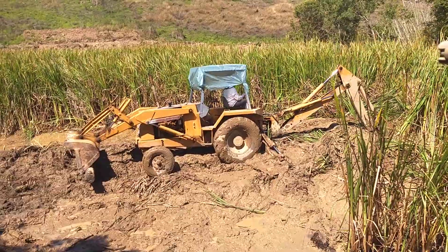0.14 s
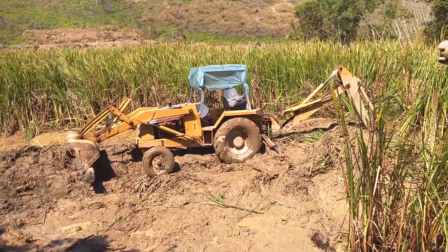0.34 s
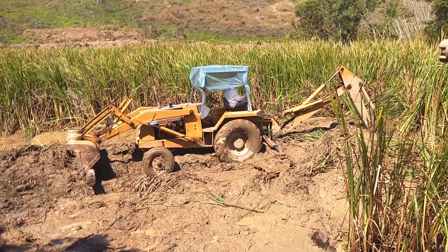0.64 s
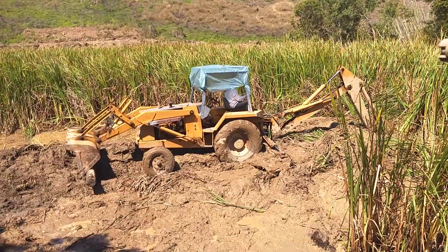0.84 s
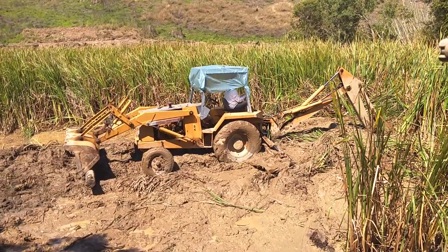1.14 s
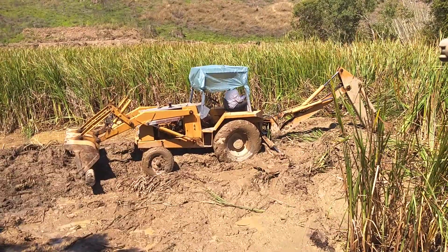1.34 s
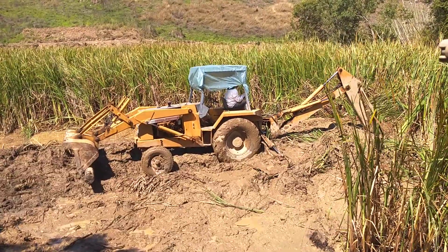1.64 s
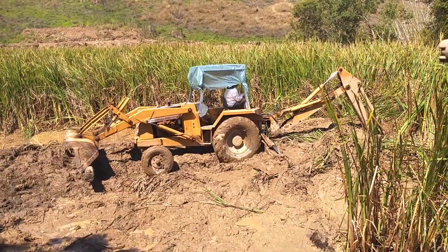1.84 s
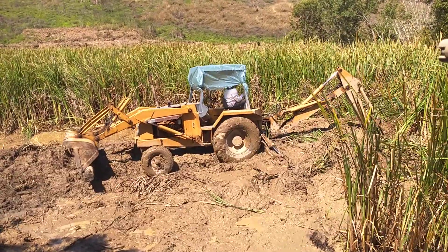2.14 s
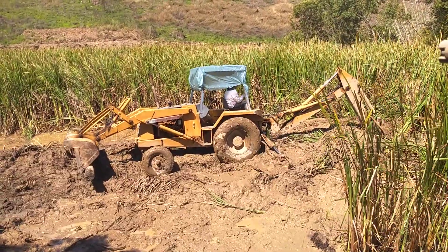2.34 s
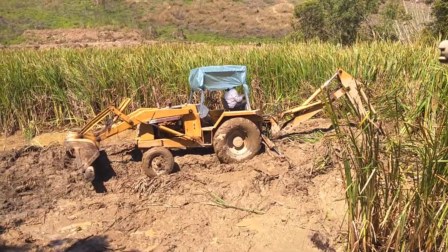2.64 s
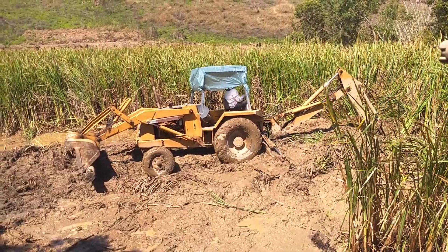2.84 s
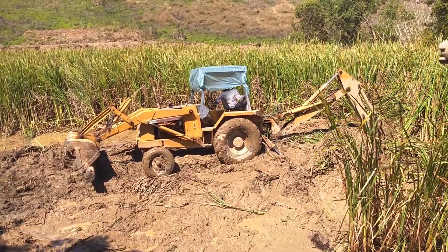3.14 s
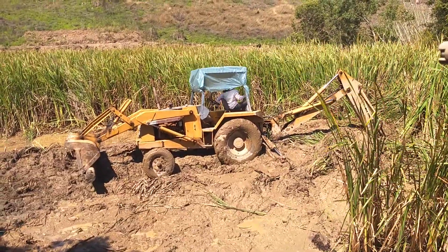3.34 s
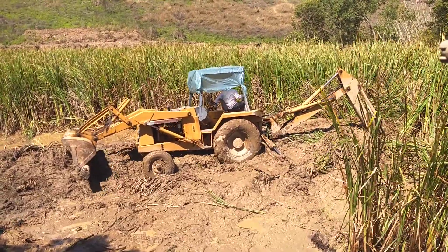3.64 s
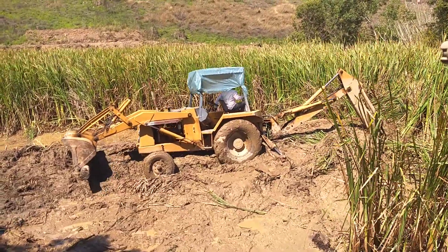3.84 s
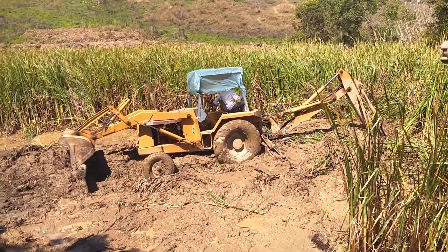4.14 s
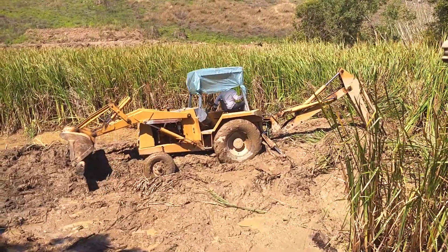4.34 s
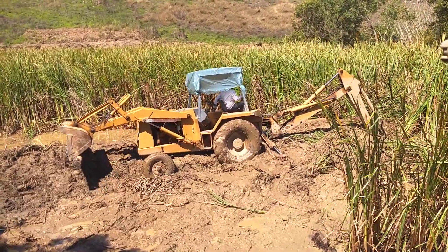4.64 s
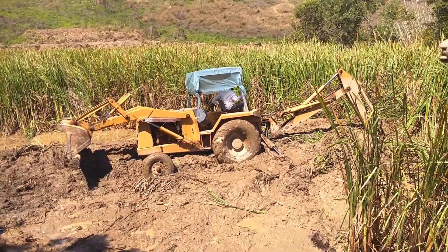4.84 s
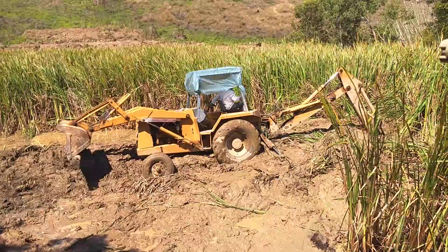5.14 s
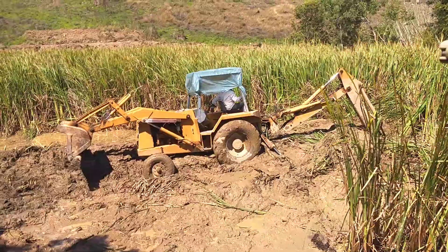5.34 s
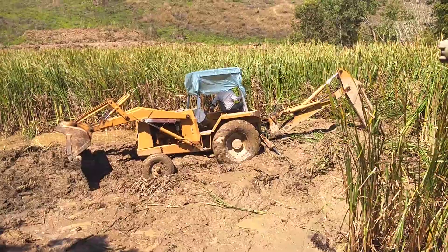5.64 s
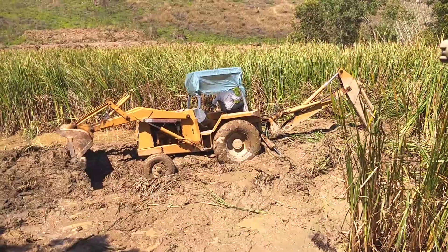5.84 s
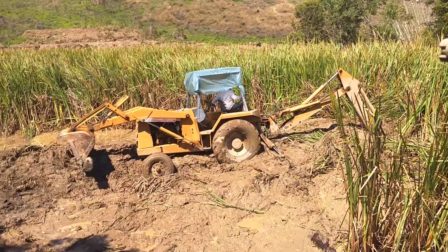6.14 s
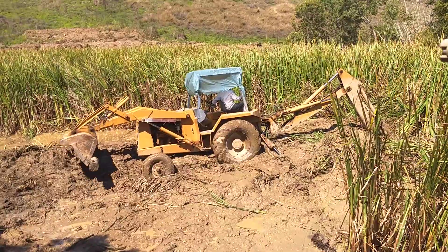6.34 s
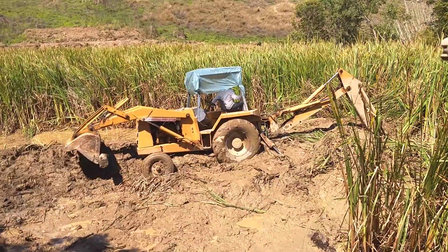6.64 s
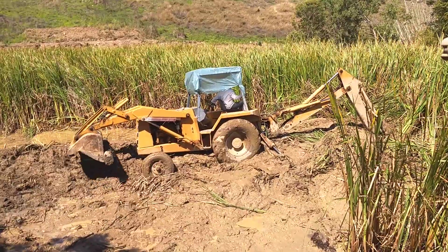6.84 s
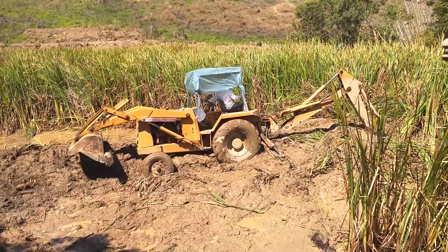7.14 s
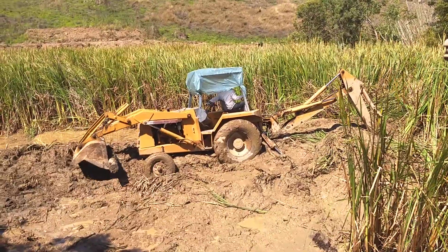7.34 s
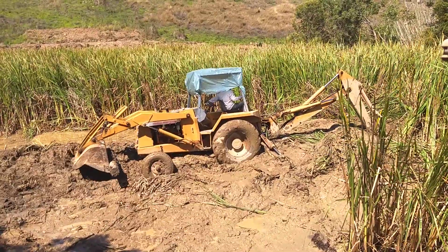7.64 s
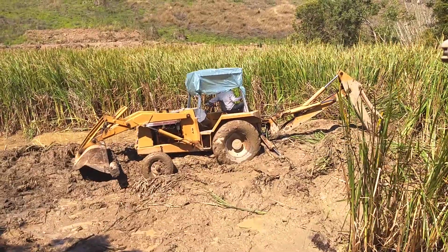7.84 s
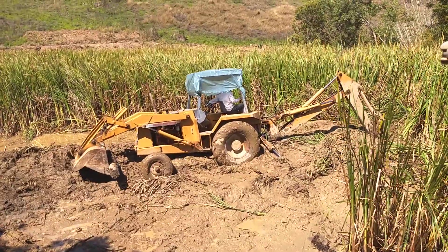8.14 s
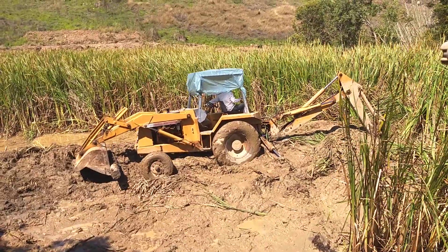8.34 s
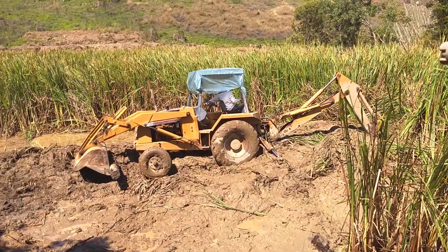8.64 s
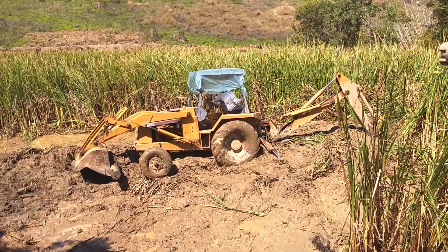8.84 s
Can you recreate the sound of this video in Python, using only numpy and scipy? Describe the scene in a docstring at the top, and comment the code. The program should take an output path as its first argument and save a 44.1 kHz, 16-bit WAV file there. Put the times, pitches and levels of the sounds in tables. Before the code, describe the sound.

Two diesel engines rumble low and hollow on soft ground, one straining now and then, with a few sharp metallic bucket bangs mid-way.

```python
"""Two diesels throb throughout: a backhoe's exhaust note beats against a second, slower and steady engine.
The backhoe sags under load and recovers, with hums locked to its crankshaft and noise pulsed by its firings.
Reeds rustle as shaped noise, and the steel bucket clanks as noise bursts and decaying modes.
Once the sound skips a moment, with a click. The left channel is weaker and of opposite polarity;
the machines reach it later than the right, which makes the rumble wide and hollow."""
import sys
import numpy as np
from scipy.fft import rfft, irfft, next_fast_len
from scipy.io import wavfile
from scipy.ndimage import map_coordinates

SR = 44100
rng = np.random.default_rng(int(sys.argv[2]) if len(sys.argv) > 2 else 0)


def store_pcm(level_fs):
    """Save levels as 16-bit WAV."""
    pcm = np.round(np.clip(level_fs, -1, 1) * 32767).astype(np.int16)
    wavfile.write(sys.argv[1], SR, np.atleast_2d(pcm).T)


N = 397341  # length in samples


def amp(db):
    """Decibels to gain."""
    return 10 ** (np.asarray(db) / 20)


def unit(x):
    """Scale to rms 1."""
    return x / np.sqrt(np.mean(x ** 2) + 1e-20)


def along(points, hz):
    """Read (Hz, value) points on a log frequency axis."""
    f, value = np.transpose(points)
    return np.interp(np.log(hz + 1), np.log(f + 1), value)


def curves(rows):
    """One value per sample for each column after the time."""
    seconds, *columns = np.transpose(rows)
    return [np.interp(np.arange(N) / SR, seconds, column) for column in columns]


def wobble(rate):
    """A smooth random curve with rate knots a second."""
    knots = np.random.default_rng(rng.integers(2 ** 31)).standard_normal(int(N * rate / SR) + 4)
    return map_coordinates(knots, [np.arange(N) * rate / SR])


def filtered(x, response):
    """Filter x by a complex response of frequency."""
    size = next_fast_len(N + SR // 2)
    spectrum = rfft(x, size) * response(np.fft.rfftfreq(size, 1 / SR))
    return irfft(spectrum, size)[..., :N]


def coloured(x, spectrum):
    """Shape x by (Hz, dB) points, then scale it to rms 1."""
    return unit(filtered(x, lambda hz: amp(along(spectrum, hz))))


def resonances(modes, f):
    """Response of a few resonances, alternating in sign."""
    total = 0
    for k, (centre, width, db) in enumerate(modes):
        peak = 1j * f * width / (centre * centre - f * f + 1j * f * width)
        total = total + (-1) ** k * amp(db) * peak
    return total


# How alike the two channels are. Each row: frequency in Hz, likeness from 0 to 1.
CHANNEL_LIKENESS = [(300, 0.98), (600, 0.96), (1200, 1), (1800, 0.96), (2500, 0.96), (4000, 0.94),
                    (8000, 0.77), (12000, 0.77), (15000, .62)]


def air():
    """White noise at two microphones, less alike towards the treble."""
    def mid_and_side(hz):
        turn = np.arccos(np.clip(along(CHANNEL_LIKENESS, hz), 0, 1)) / 2
        return np.array([np.cos(turn), np.sin(turn)])
    mid, side = filtered(rng.standard_normal((2, N)), mid_and_side)
    return np.array([mid + side, mid - side])


def mechanical(cycles, repeat):
    """Noise of which a share of the power comes back alike with every round of the four cylinders."""
    size = 3200  # pattern points a round
    pattern = rng.standard_normal(size)
    locked = map_coordinates(pattern, [cycles / 4 % 1 * size], mode="grid-wrap")
    share = np.clip(repeat, 0, 1)
    return np.sqrt(share) * locked + np.sqrt(1 - share) * air()


def firings(cycles, cylinder_db, scatter_db, decay):
    """A burst at each firing, decaying over a number of cycles; four unequal cylinders take turns."""
    index = cycles.astype(int)
    scatter = scatter_db * rng.standard_normal(N // 100)[index]
    size_db = scatter + np.array(cylinder_db)[index % len(cylinder_db)]
    return unit(amp(size_db) * np.exp(-(cycles % 1) / decay))


def tones(cycles, orders, waver_db, rate):
    """Lines locked to the crankshaft, each wavering in strength."""
    total = 0
    for order, db in orders:
        total = total + amp(db + waver_db * wobble(rate)) * np.sin(2 * np.pi * order * cycles)
    return np.sqrt(2) * total


def struck(modes, t, blur):
    """Steel modes, rung at new strengths by every blow; rattling contacts blur their pitch."""
    total = 0
    for hz, db, t60 in modes:
        strength_db = db + rng.normal(0, 0.34)
        # A random start phase, then a random walk, in cycles
        drift = rng.random() + blur * np.cumsum(rng.standard_normal(len(t))) / np.sqrt(SR)
        total = total + amp(strength_db - 60 * t / t60) * np.sin(2 * np.pi * (hz * t + drift))
    return total


def knocked(modes, hits, blur):
    """One steel part, its modes rung by each hit."""
    out, t = np.zeros(N + SR), np.arange(SR // 2) / SR
    rise = 1 - np.exp(-t / .001)
    for seconds, db in hits:
        start = round(seconds * SR)
        out[start:start + len(t)] += amp(db) * rise * struck(modes, t, blur)
    return out[:N]


# Leaf rustle spectrum. Each row: frequency in Hz, relative level in dB per Hz.
LEAF_SPECTRUM = [(1200, -10), (2700, -2), (4200, 7.5), (6500, 2), (8000, -10), (11000, -13), (16000, -19)]
# Ticks of dry stalks. Each row: start in seconds, level in dB.
STALK_TICKS = [(2.958, -53), (3.080, -53), (3.880, -52), (4.460, -56), (4.556, -58), (5.274, -52)]
TICK_S = 0.049  # t60
# Stalk tick spectrum. Each row: frequency in Hz, relative level in dB per Hz.
STALK_SPECTRUM = [(1500, -20), (4000, 0), (9000, 0), (13000, 0), (16000, -10)]
LAG_S = .000415  # how much later the machines reach the left microphone


def reeds(level_db):
    """Leaves rustle and stalks tick on the side away from the engines, so they reach the left first."""
    leaves = amp(level_db + 2.5 * wobble(60)) * coloured(rng.standard_normal(N), LEAF_SPECTRUM)
    t = np.arange(N) / SR
    snaps = sum(amp(db - 60 * np.abs(t - s) / TICK_S) * (t >= s) for s, db in STALK_TICKS)
    rustle = leaves + snaps * coloured(rng.standard_normal(N), STALK_SPECTRUM)
    # Advance the left by two lags: record() delays it by one
    early = filtered(rustle, lambda hz: np.exp(4j * np.pi * hz * LAG_S))
    return np.array([early, rustle])


VALVE_DB = -64  # level at full load
# Valve hiss spectrum. Each row: frequency in Hz, relative level in dB per Hz.
VALVE_SPECTRUM = [(2000, -80), (3400, -24), (3850, 3), (4000, 0), (4400, -24), (7000, -80)]


def valve(load):
    """Oil hisses through the hydraulic valve when the load peaks."""
    return amp(VALVE_DB) * load ** 3 * coloured(air(), VALVE_SPECTRUM)


# Fan and hydraulic hiss spectrum. Each row: frequency in Hz, relative level in dB per Hz.
HISS_SPECTRUM = [(1200, -25), (2800, -1.5), (3300, 2.5), (4200, -5.5), (4900, 6), (6000, -1), (7100, -3.5),
                 (8300, -1), (10000, -4.5), (12000, -6.5), (13200, -3), (14500, -11), (16000, -8.5)]


def hiss(cycles, load, level_db):
    """Fan and hydraulics hiss with a fine crackle; under load the injectors tick through."""
    ticks = firings(cycles, [.5, -.5, .4, -.4], scatter_db=2, decay=.35)
    crackle = amp(1.2 * wobble(230) + 1.1 * wobble(40))
    flutter = crackle * (1 + 0.12 * load * ticks)
    return amp(level_db) * coloured(mechanical(cycles, repeat=0.11) * flutter, HISS_SPECTRUM)


# Gear whine lines. Each row: multiple of the firing rate, level in dB over the whine level.
GEAR_ORDERS = [(21, -4), (27, -3.5), (34.5, -7), (36, 2.5), (38, -8), (39, -15), (41.2, -21), (57.6, -8.5),
               (69, -19)]
# Whine level. Each row: time in seconds, level in dB.
WHINE_LEVEL = [(0, -59.5), (1.3, -65), (2.4, -57), (3.4, -68), (5, -64), (6.1, -63), (7.3, -71), (8.1, -60),
               (8.6, -63.5), (9, -63)]


def whine(cycles):
    """Gear teeth sing, blurred by the uneven turning of the shaft."""
    level_db, = curves(WHINE_LEVEL)
    unevenness = .0045 * wobble(28) + .0013 * wobble(110)  # in cycles
    return amp(level_db) * tones(cycles + unevenness, GEAR_ORDERS, waver_db=2.5, rate=22)


# Drone level. Each row: time in seconds, level in dB before the trim below.
DRONE_LEVEL = [(0, -56), (0.6, -37), (1.2, -44), (1.9, -62), (2.9, -47), (3.7, -62), (4.45, -38),
               (4.9, -60), (5.15, -34), (5.52, -30.5), (5.65, -48), (5.95, -34), (6.6, -55), (7.2, -45),
               (7.9, -40.5), (8.6, -38.5), (9, -39)]
DRONE_TRIM_DB = -1


def drone(cycles):
    """The backhoe's fifth order drones in the silencer, swelling and fading."""
    level_db, = curves(DRONE_LEVEL)
    uneven = cycles + .004 * wobble(20)
    return amp(level_db + DRONE_TRIM_DB) * tones(uneven, [(5, 0)], waver_db=1.5, rate=12)


# Low modes of the bucket's shell. Each row: frequency in Hz, relative level in dB, t60 in seconds.
SHELL_MODES = [(198, -4.5, .3), (263.8, -4, 0.44), (379, -9, 0.22), (487, -17.5, 0.41)]
# Thuds of the shell. Each row: start in seconds, level in dB.
SHELL_THUDS = [(6.333, -16.5), (6.366, -17), (6.432, -24.5)]
# Modes of the bucket's end stop. Each row: frequency in Hz, relative level in dB, t60 in seconds.
STOP_MODES = [(883, 4, 0.22), (1944, 0, .25), (3480, -11, 0.22), (4800, -8, 0.22), (4960, -13, .25),
              (5100, -8, 0.27), (5840, -15, .25)]
# Rebounds on the stop. Each row: start in seconds, level in dB.
STOP_REBOUNDS = [(6.403, -39.5), (6.418, -45)]
# Modes of the bucket link. Each row: frequency in Hz, relative level in dB, t60 in seconds.
LINK_MODES = [(2460, -5, .25), (2600, 2, 0.24), (2955, -10, .4), (4340, -16, .4), (4936, -10, .33)]
# Clinks of the link. Each row: start in seconds, level in dB.
LINK_CLINKS = [(7.070, -50), (7.095, -49)]


def linkage():
    """The bucket's shell thuds, it rebounds on its stop, and its slack link clinks on the pin."""
    shell = knocked(SHELL_MODES, SHELL_THUDS, blur=1.4)
    stop = knocked(STOP_MODES, STOP_REBOUNDS, blur=2.2)
    link = knocked(LINK_MODES, LINK_CLINKS, blur=1.5)
    return shell + stop + link


# Blows and rattles. Each row: start in seconds, clang in dB, scrape in dB, bucket ring in dB,
# arm ring in dB, t60 of the clang and scrape in seconds.
BUCKET_BLOWS = [(3.46, -24, -50, -62, -46, 0.22), (3.474, -34, -50, -54, -43.5, .1),
                (3.492, -42, -44, -62, -47.5, 0.3), (3.530, -38, -54, -66, -51, .2),
                (5.163, -54, -53, -63, -75, 0.11), (6.331, -25.5, -66, -48, -70, 0.17),
                (6.345, -18.5, -62, -34, -60, 0.12), (6.370, -36, -58, -35.5, -70, 0.12),
                (6.401, -30.5, -53, -38, -58, 0.39), (6.415, -35, -55, -37, -60, .25),
                (6.438, -31, -59, -45, -54, 0.28), (6.468, -36, -59, -45, -66, 0.23),
                (6.547, -37, -50, -60, -75, .08), (6.596, -32, -60, -58, -75, .1),
                (6.903, -48, -51, -64, -75, .15), (7.065, -29, -57, -57, -65, 0.24),
                (7.075, -30, -60, -48, -64, .08), (7.095, -32, -57, -60, -65, 0.12)]
# First contact of a blow: level over its chatter, and t60
CRACK_DB, CRACK_S = -7, 0.012
# Dull clang spectrum. Each row: frequency in Hz, relative level in dB per Hz.
CLANG_SPECTRUM = [(100, -16), (190, 21), (280, 16), (450, 3), (750, 6.5), (1000, -1), (1400, -4.5),
                  (1800, -2), (2500, -10), (3200, -23), (5200, -23), (8000, -50), (15000, -53)]
# Bright scrape spectrum. Each row: frequency in Hz, relative level in dB per Hz.
SCRAPE_SPECTRUM = [(600, -25), (1500, 2), (2200, 13), (3300, -8), (5300, 1), (8000, -2.5), (12000, -1),
                   (16000, -24)]
# Bucket modes. Each row: frequency in Hz, relative level in dB, t60 in seconds.
BUCKET_MODES = [(700, 0.5, 0.2), (810, -4, 0.24), (1227, -5, .15), (1478, -2, 0.15), (1695, 0, 0.21),
                (1993, 0.5, 0.22), (2090, -2, 0.19), (2450, -8, 0.3), (2690, -10, 0.16), (3070, -16, 0.15),
                (3720, -21, .18)]
# Loader arm modes. Each row: frequency in Hz, relative level in dB, t60 in seconds.
ARM_MODES = [(500, 2, .2), (764, 2, 0.3), (883, -4, .25), (1217, -5, .25), (1525, 5, 0.16), (2272, 5, 0.26),
             (2433, 7, 0.32), (2620, -2, 0.4), (2955, -4, 0.42), (3386, -8, 0.4), (3900, -17, .35),
             (5367, -10.5, 0.32), (5819, -20, .3), (6487, -12, 0.28)]


def bucket():
    """Blows crack and set loose steel chattering: dull clang, bright scrape, ring of bucket and arm."""
    clang_power, scrape_power, ring = np.zeros((3, N + SR))
    t = np.arange(SR // 2) / SR
    rise = 1 - np.exp(-t / .0008)
    for seconds, clang_db, scrape_db, bucket_db, arm_db, t60 in BUCKET_BLOWS:
        start = round(seconds * SR)
        span = slice(start, start + len(t))
        fade = rise * (amp(-60 * t / t60) + amp(CRACK_DB - 60 * t / CRACK_S))
        # Overlapping noise bursts add in power
        clang_power[span] += (amp(clang_db) * fade) ** 2
        scrape_power[span] += (amp(scrape_db) * fade) ** 2
        bucket_ring = amp(bucket_db) * struck(BUCKET_MODES, t, blur=2.3)
        arm_ring = amp(arm_db) * struck(ARM_MODES, t, blur=1.1)
        ring[span] += rise * (bucket_ring + arm_ring)
    clang = np.sqrt(clang_power[:N]) * coloured(air(), CLANG_SPECTRUM)
    scrape = np.sqrt(scrape_power[:N]) * coloured(air(), SCRAPE_SPECTRUM)
    chatter = unit(amp(3 * wobble(380)))
    return chatter * (clang + scrape) + ring[:N] * unit(amp(1.5 * wobble(200)))


# Ringing covers. Each row: time in seconds, level in dB over the block clatter.
COVER_LEVEL = [(0, -8), (0.7, -5), (1.25, -3), (1.9, -7.5), (3.0, -6.5), (3.75, -3.5), (4.3, -8.5),
               (4.85, 1), (5.2, -9), (5.8, -4), (7.3, -7), (9, -7)]
# Resonances of block and covers. Each row: frequency in Hz, width in Hz, relative level in dB.
COVER_RESONANCES = [(577, 18, 6), (810, 41, -0.5), (1154, 61, 5), (1437, 42, 1), (1695, 34, -17),
                    (2030, 32, -11)]
# Block clatter spectrum. Each row: frequency in Hz, relative level in dB per Hz.
BLOCK_SPECTRUM = [(200, -42), (450, 0.5), (580, 3), (700, -5), (900, -4.5), (1020, -5.5), (1300, -10.5),
                  (1700, -9.5), (2050, -13.5), (2450, -15), (2800, -23.5), (5000, -48), (12000, -80)]


def clatter(cycles, level_db):
    """Combustion knocks and valve gear shake the block; its covers ring now harder, now softer."""
    covers_db, = curves(COVER_LEVEL)
    knocks = firings(cycles, [.8, -.2, 0, -.6], scatter_db=1, decay=3.6)
    ring_source = knocks * mechanical(cycles, repeat=0.26)
    ring = unit(filtered(ring_source, lambda f: resonances(COVER_RESONANCES, f)))
    block = coloured(knocks * mechanical(cycles, repeat=0.28), BLOCK_SPECTRUM)
    return amp(level_db) * block + amp(level_db + covers_db) * ring


# Backhoe exhaust, belt-driven fan and pump notes. Each row: multiple of the firing rate,
# level in dB, change at full load in dB.
BACKHOE_NOTES = [(1, -14.5, -2), (2, -26.5, 6.5), (3, -53.5, 16), (3.75, -49.5, 0), (4, -57.5, 18),
                 (4.36, -37.5, -7), (4.9, -46.5, -3)]
# Second engine's notes. Each row: multiple of its firing rate, level in dB.
SECOND_NOTES = [(1, -20.5), (1.5, -39), (2, -21), (2.5, -46), (3, -52.5), (4, -52), (4.5, -48), (5, -44.5),
                (5.5, -44.5), (6, -47.5), (7, -50.5)]
# Exhaust rasp spectrum. Each row: frequency in Hz, relative level in dB per Hz.
RASP_SPECTRUM = [(60, -14), (125, -15), (158, -3), (176, -9), (198, 3), (220, -5), (243, -0.5), (280, -1.5),
                 (360, -7.5), (450, -18.5), (650, -32), (2000, -67)]
# Silencer resonances. Each row: frequency in Hz, width in Hz, relative level in dB.
SILENCER_RESONANCES = [(194.5, 15.2, -1), (236, 22.6, -4), (279, 35.6, -6)]
GRUNT_DB = -41  # level at full load
# Silencer grunt spectrum. Each row: frequency in Hz, relative level in dB per Hz.
GRUNT_SPECTRUM = [(60, -90), (115, -25), (145, 0), (185, -3), (215, -22), (450, -100)]
# Low rumble spectrum. Each row: frequency in Hz, relative level in dB per Hz.
RUMBLE_SPECTRUM = [(10, -28), (22, -37), (40, 0), (60, 0), (100, 1.5), (130, -5.5), (200, -21), (500, -69)]


def exhaust(backhoe, second, load, level_db):
    """Both pipes hum, and puffs rasp and boom in the silencer; the backhoe grunts lower under load."""
    loaded = [(order, db + change_db * load) for order, db, change_db in BACKHOE_NOTES]
    hum = tones(backhoe, loaded, waver_db=1.0, rate=5.5)
    hum = hum + tones(second, SECOND_NOTES, waver_db=0.7, rate=7)
    near = firings(backhoe, [-0.16, -0.19, 0.59, -0.33], scatter_db=1.0, decay=1.7)
    near = near * mechanical(backhoe, repeat=0.13)
    far = firings(second, [-0.0071, -0.31, -0.12, 0.27], scatter_db=1.0, decay=1.4)
    far = far * mechanical(second, repeat=0.13)
    rasp = amp(level_db - 0.58) * coloured(near + far, RASP_SPECTRUM)
    boom = unit(filtered(near - far, lambda f: resonances(SILENCER_RESONANCES, f) * (f > 150)))
    grunt = amp(GRUNT_DB) * load * coloured(near, GRUNT_SPECTRUM)
    rumble = amp(-31.5) * coloured(air(), RUMBLE_SPECTRUM)
    return hum + rasp + amp(level_db - 7.5) * boom + grunt + rumble


# The sound skips: when, and how much is missing
SKIP_AT_S, SKIP_S = 1.87, .05


def turned(hz):
    """Firings counted so far; at the skip the count jumps ahead, which clicks."""
    missing = SKIP_S * hz[round(SKIP_AT_S * SR)]
    return np.cumsum(hz) / SR + missing * (np.arange(N) > SKIP_AT_S * SR)


# Backhoe speed. Each row: time in seconds, firings a second.
BACKHOE_SPEED = [(0.0, 56.03), (0.7, 54.47), (1.2, 50.31), (1.4, 52.91), (1.8, 51.01), (1.9, 55.15),
                 (2.5, 55.33), (3.5, 55.24), (3.85, 54.2), (4.35, 54.34), (4.86, 49.21), (5.15, 55.32),
                 (6.4, 55.0), (7.0, 55.82), (7.33, 53.14), (8.2, 51.3), (8.5, 55.82), (9.01, 55.72)]
# Second engine: mean firings a second, and the share of a firing by which it starts ahead
SECOND_HZ, SECOND_LEAD = 43.36, .35
# Levels running free, and their changes at full load
RASP_DB, RASP_LOAD_DB = -29.5, -1
CLATTER_DB, CLATTER_LOAD_DB = -42.5, -1.35
# Treble reference. Each row: time in seconds, level in dB.
TREBLE_LEVEL = [(0.0, -63), (1.38, -66.5), (3.69, -63), (4.26, -64.5), (4.64, -64.5), (4.97, -65),
                (6.25, -62), (7.3, -67), (9.01, -65)]
HISS_DB, REEDS_DB = 5.5, -4.5  # over the treble reference


def scene():
    """Two engines, reeds and bucket; the sag in speed gives the load, which sets rasp and clatter."""
    speed, = curves(BACKHOE_SPEED)
    treble_db, = curves(TREBLE_LEVEL)
    load = (speed.max() - speed) / np.ptp(speed)  # 0 at top speed, 1 at the deepest sag
    backhoe = turned(speed + 0.0627 * wobble(9))
    second = turned(SECOND_HZ + 0.0505 * wobble(7)) + SECOND_LEAD
    rasp_db = RASP_DB + RASP_LOAD_DB * load
    clatter_db = CLATTER_DB + CLATTER_LOAD_DB * load + 0.11 * wobble(3.5)
    treble = reeds(treble_db + REEDS_DB) + valve(load) + hiss(backhoe, load, treble_db + HISS_DB)
    steel = linkage() + bucket()
    engines = clatter(backhoe, clatter_db) + exhaust(backhoe, second, load, rasp_db)
    return treble + whine(backhoe) + drone(backhoe) + steel + engines


# Left channel against right. Each row: frequency in Hz, level in dB.
LEFT_LEVEL = [(200, -2), (1000, -2.5), (2000, -2.5), (4000, -4.5), (5500, -4.5), (11500, -4.5), (13500, -6),
              (16000, -14)]
# Left channel's phase lag beyond LAG_S. Each row: frequency in Hz, lag in radians.
LEFT_PHASE_LAG = [(300, 0), (1000, .23), (2200, .37), (4500, .4), (8000, .2), (15000, .08)]
TOP_HZ = 15750  # nothing passes from here up


def record(dry):
    """The left channel is inverted, late and duller, and held briefly at the skip; the top is cut."""
    def left_response(hz):
        phase = 2 * np.pi * hz * LAG_S + along(LEFT_PHASE_LAG, hz)
        return -amp(along(LEFT_LEVEL, hz)) * np.exp(-1j * phase)
    left = filtered(dry[0], left_response)
    # Hold a later value over the lag, so that both channels jump at one instant
    cut, late = int(SKIP_AT_S * SR) + 1, int((SKIP_AT_S + 2 * LAG_S) * SR)
    left[cut:late] = left[late]
    return filtered(np.array([left, dry[1]]), lambda hz: hz < TOP_HZ)


dry = scene()
out = record(dry)
store_pcm(out)
```